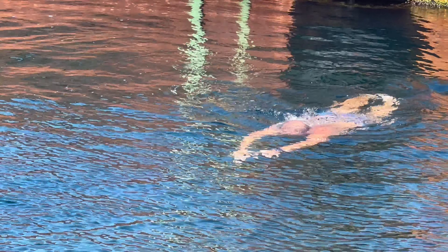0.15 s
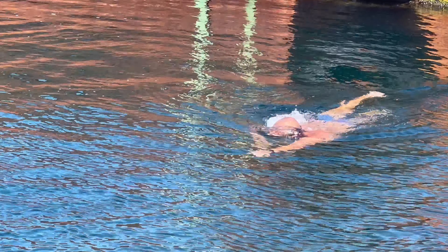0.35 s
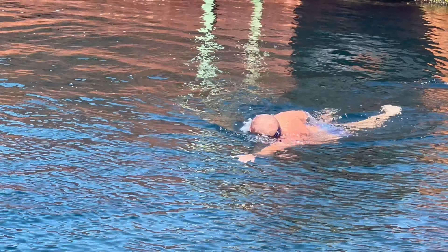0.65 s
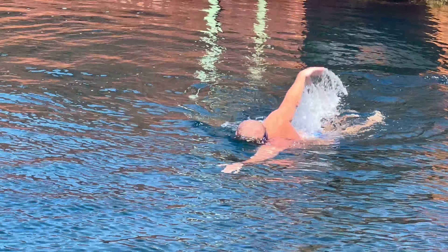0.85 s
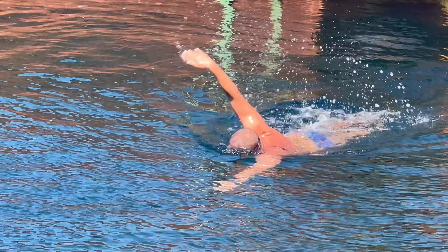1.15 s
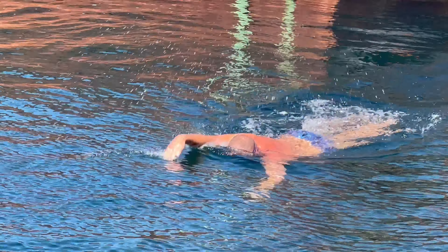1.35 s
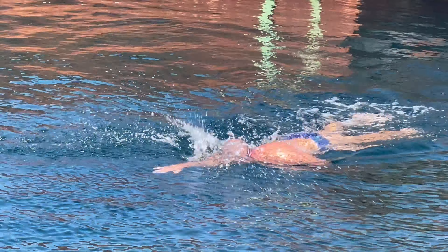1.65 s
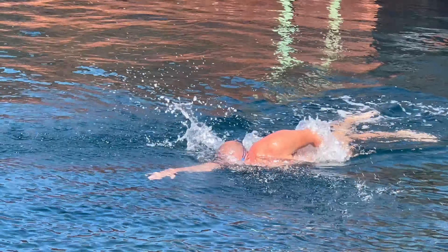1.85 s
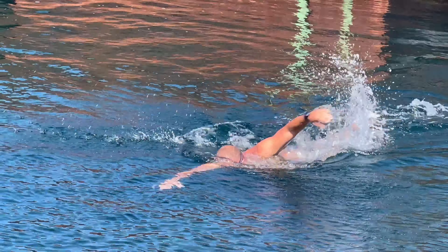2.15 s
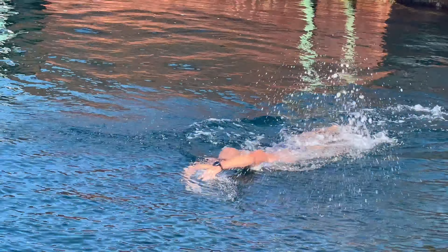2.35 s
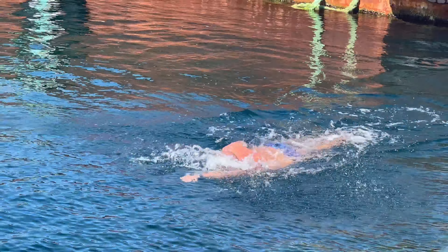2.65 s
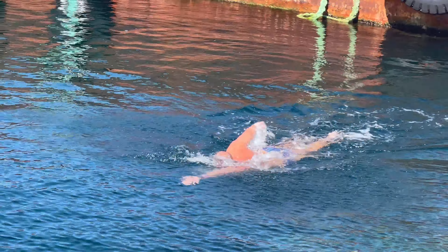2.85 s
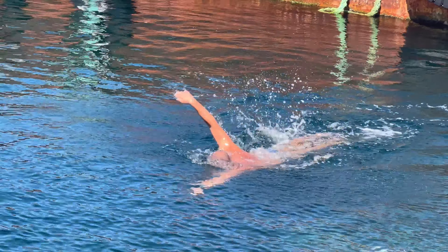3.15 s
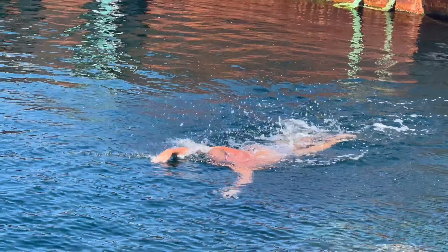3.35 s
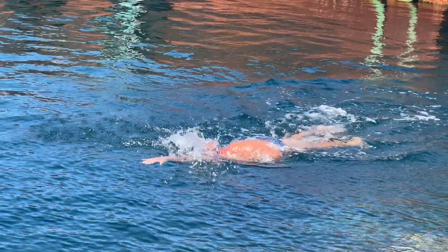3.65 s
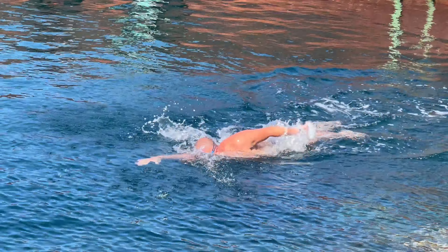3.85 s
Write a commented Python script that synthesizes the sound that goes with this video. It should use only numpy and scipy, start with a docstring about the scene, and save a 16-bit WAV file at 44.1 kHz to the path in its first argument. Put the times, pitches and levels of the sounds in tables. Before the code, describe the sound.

A swimmer does front crawl some way off, at first barely heard over a harbour's steady wash. Gusty wind rumbles and thumps on the microphone throughout, easing briefly between 0.5 and 1.1 seconds. Hands slap the water near 1.4, 2.4 and 3.4 seconds, with gurgles, bubbles and falling spray in between. The churning grows toward the end, with another splash near 3.9 seconds.

```python
"""Gusty wind rumbles, flutters and thumps on the microphone from the start, over a harbour's steady wash.
Some way off a swimmer does front crawl, at first barely heard. Near 1.4 s a hand slaps in, and
slaps return about once a second; between them trapped air gulps, bubble clouds ring and spray rains back.
The quay wall gives the plops a short, dull tail, and the churning grows toward the end."""
import sys
import numpy as np
from scipy import signal
from scipy.fft import rfft, irfft, next_fast_len
from scipy.io import wavfile
from scipy.ndimage import uniform_filter1d, map_coordinates

SR = 44100
rng = np.random.default_rng(int(sys.argv[2]) if len(sys.argv) > 2 else 0)


def generate_wav(sig):
    """Save sig (samples, or channels by samples) to the path in sys.argv[1] as 16-bit PCM at SR."""
    pcm = np.round(np.clip(np.atleast_2d(sig).T, -1, 1) * 32767).astype(np.int16)
    wavfile.write(sys.argv[1], SR, pcm)


N = 176400
TOP_HZ = 15850

# stereo image of the water noises (frequency [Hz], left-right likeness [0-1])
WATER_LIKENESS = [(200, 0.58), (450, 0.76), (750, 0.19), (1200, 0.72), (2100, 1), (4200, 0.89),
                  (7000, 0.83), (8700, 1), (10000, 1), (12000, 0.64), (13500, 1), (15500, 0.69)]


def amp(db):
    """Decibels to gain."""
    return 10 ** (np.asarray(db) / 20)


def unit(x):
    """Scale to rms 1."""
    return x / np.sqrt(np.mean(x ** 2) + 1e-20)


def clock():
    """The time of every sample, in seconds."""
    return np.arange(N) / SR


def along(points, hz):
    """Read (frequency, value) points on a log axis."""
    freqs, values = np.transpose(points)
    return np.interp(np.log(hz + 1), np.log(freqs + 1), values)


def curve(points):
    """Read (time, value) points at every sample."""
    return np.interp(clock(), *np.transpose(points))


def wobble(rate):
    """A smooth random curve with `rate` knots a second."""
    return map_coordinates(rng.standard_normal(4096), [clock() * rate], mode="wrap")


def filtered(x, response):
    """Filter x by a gain given as a function of frequency."""
    size = next_fast_len(N + SR // 4)
    return irfft(rfft(x, size) * response(np.fft.rfftfreq(size, 1 / SR)), size)[..., :N]


def stereo_noise(spectrum, likeness, patchy_db):
    """Coloured stereo noise, mottled in time and pitch by patches of random gain; rms 1."""
    cells = signal.stft(rng.standard_normal((2, N)), nperseg=256)[2]
    patches = uniform_filter1d(rng.standard_normal(cells.shape[1:]), size=4, axis=0)
    patches = unit(uniform_filter1d(patches, size=5, axis=1))
    pair = unit(signal.istft(cells * amp(patchy_db * patches), nperseg=256)[1][:, :N])

    def mid_side_gains(hz):
        width = np.arccos(np.clip(along(likeness, hz), -.99, .99)) / 2
        return amp(along(spectrum, hz)) * np.array([np.cos(width), np.sin(width)])

    mid, side = filtered(pair, mid_side_gains)
    return unit(np.array([mid + side, mid - side]))


def bubbles(starts, hz, gains, cycles, glide):
    """Bubbles ring as sines that glide upward while dying by 60 dB in `cycles` periods."""
    samples = np.arange(SR // 30)
    turns = hz[:, None] * samples / SR
    age = turns / cycles
    envelopes = gains[:, None] * np.exp(-np.log(1000) * age) * (1 - np.exp(-2 * turns))
    rings = envelopes * np.sin(2 * np.pi * turns * (1 + glide * age))
    positions = np.round(starts * SR).astype(int)[:, None] + samples
    return np.bincount(positions.ravel(), rings.ravel(), N)[:N]


def drops(count, low_hz, high_hz, cycles, scatter_db):
    """A shower of small bubbles, a few of them much louder; rms 1."""
    when, pitch, size = rng.random((count, 3)).T
    hz = low_hz * (high_hz / low_hz) ** pitch
    gains = amp(-scatter_db * np.log(size + .01))
    return unit(bubbles(when * N / SR, hz, gains, cycles, glide=0.093))


def wash():
    """The bed: open water washing steadily, far off."""
    # tone of the wash (frequency [Hz], relative level [dB])
    spectrum = [(40, 1.5), (200, -8.5), (450, 3), (750, -0.5), (1050, 0), (1500, -10), (2300, -12.5),
                (4000, -25), (8000, -32.5), (15000, -32)]
    return amp(-48.5 + 0.24 * wobble(7.3)) * stereo_noise(spectrum, WATER_LIKENESS, patchy_db=2.0)


def gusts():
    """Wind on the microphone drives a deep rumble and a choppy flutter."""
    # wind strength (time [s], relative level [dB])
    strength = [(0.04, -31), (0.15, -36), (0.22, -32), (0.24, -36), (0.34, -33), (0.5, -48), (0.69, -39),
                (0.91, -51.5), (1.23, -28.5), (1.35, -37), (1.47, -35), (1.51, -34.5), (1.57, -32.5),
                (1.62, -40.5), (1.74, -31.5), (2.08, -36.5), (2.19, -39.5), (2.25, -30.5), (2.38, -35.5),
                (2.4, -37.5), (2.59, -36), (2.63, -41.5), (2.86, -33.5), (2.9, -43), (2.96, -30),
                (3.06, -34), (3.08, -30), (3.23, -45), (3.27, -30.5), (3.37, -34.5), (3.66, -33.5),
                (3.69, -28.5), (3.71, -30), (3.84, -30), (3.89, -30.5), (4.0, -31)]
    # the flutter's ride on top of that strength (time [s], relative level [dB])
    flutter_ride = [(.04, -3.5), (.2, -8), (.33, -5.5), (.9, -9), (1.2, -7.5), (1.35, 2.5), (1.6, -13.5),
                    (1.8, -2), (2.1, -6), (2.3, -5), (2.6, 2.5), (2.9, -2), (3.1, -4.5), (3.4, -7.5),
                    (3.65, -4.5), (3.92, -2)]
    # tone of the rumble (frequency [Hz], relative level [dB])
    rumble_spectrum = [(20, -22), (35, -8), (50, -5.5), (68, 0.5), (110, -2), (170, -8), (300, -22),
                       (550, -36), (1200, -71), (5000, -100)]
    # tone of the flutter (frequency [Hz], relative level [dB])
    flutter_spectrum = [(50, -21), (130, -0.5), (250, 4), (420, -5), (600, -13.5), (900, -28), (2000, -53),
                        (6000, -89)]
    # stereo image of the wind (frequency [Hz], left-right likeness [0-1])
    likeness = [(60, 0.9), (250, 0.87), (500, 0.77), (900, 0.17)]
    strength_db = curve(strength)
    rumble_gain = amp(strength_db + 2.8 + 0.73 * wobble(30))
    rumble = stereo_noise(rumble_spectrum, likeness, patchy_db=1.24)
    flutter_gain = amp(strength_db + curve(flutter_ride) - 1)
    flutter = unit(amp(2.7 * wobble(70)) * stereo_noise(flutter_spectrum, likeness, patchy_db=1.0))
    return rumble_gain * rumble + flutter_gain * flutter


def eddy(hz, rise_cycles=1.21, wander_depth=0.27):
    """One swirl of air pressure swells and dies in a few uneven cycles."""
    turns = hz * np.arange(SR // 16) / SR
    age = turns / rise_cycles
    wander = map_coordinates(rng.standard_normal(128), [2 * turns], mode="wrap")
    phase = rng.random() + np.cumsum(hz * np.exp(wander_depth * wander)) / SR
    return age * np.exp((1 - age ** 2) / 2) * np.sin(2 * np.pi * phase)


def wind_thumps(wake_db=-8.5, wake_delay_s=0.00687, wake_ratio=0.672, lowpass_hz=750):
    """Single eddies thump the microphone, each trailing a softer, lower wake."""
    # eddy hits (time [s], relative level [dB], pitch [Hz])
    hits = [(0.047, -21, 317), (.056, -26.5, 260), (.082, -25.5, 394), (0.159, -27, 210), (0.2, -18, 128),
            (0.256, -25, 307), (0.277, -20, 248), (.289, -17, 302), (0.297, -17.5, 440),
            (0.332, -21.5, 360), (.349, -26, 300), (.382, -21.5, 370), (.404, -31.5, 370),
            (0.574, -23.5, 205), (0.651, -29.5, 397), (.685, -26, 240), (1.058, -25.5, 190),
            (1.15, -18, 345), (1.178, -27, 565), (1.198, -26, 474), (1.204, -14.5, 160),
            (1.226, -15.5, 266), (1.244, -15.5, 412), (1.292, -28, 160), (1.326, -22, 432),
            (1.359, -29, 346), (1.379, -39, 384), (1.411, -18, 301), (1.423, -22, 532), (1.459, -18, 324),
            (1.564, -25, 230), (1.695, -22.5, 228), (1.776, -19, 380), (1.791, -22, 214),
            (1.823, -17.5, 363), (1.863, -23, 390), (1.906, -22.5, 258), (2.056, -18.5, 137),
            (2.18, -18.5, 246), (2.354, -24.5, 357), (2.547, -22.5, 338), (2.652, -20.5, 297),
            (2.765, -26, 246), (2.836, -19, 309), (2.945, -15, 310), (2.957, -16, 214), (3.058, -18.5, 298),
            (3.091, -25, 242), (3.11, -26.5, 336), (3.247, -20, 287), (3.304, -22.5, 318),
            (3.395, -27, 335), (3.505, -21.5, 267), (3.69, -23, 85), (3.765, -28, 336), (3.806, -28.5, 263),
            (3.904, -14.5, 380), (3.914, -14.5, 380), (3.969, -21, 307)]
    thumps = np.zeros((2, N + SR))
    for time, db, hz in hits:
        swirl = eddy(hz) + amp(-13) * eddy(hz) * np.array([[1], [-1]])  # mid plus a little side
        wake = amp(wake_db) * eddy(hz * wake_ratio)
        for start, wave in ((time, swirl), (time + wake_delay_s, wake)):
            first = round(start * SR)
            thumps[:, first:first + len(wake)] += amp(db - 4) * wave
    return filtered(thumps[:, :N], lambda hz: 1 / np.sqrt(1 + (hz / lowpass_hz) ** 8))


def churn():
    """Foam, falling spray and small bubbles swell and ebb together around the swimmer."""
    # strength of the churning (time [s], relative level [dB])
    swell = [(.04, -62), (.4, -97), (.72, -65), (.83, -59), (.9, -64.5), (1.1, -59), (1.33, -64.5),
             (1.55, -64), (1.63, -56.5), (1.69, -61), (2.01, -52), (2.1, -56), (2.4, -55.5), (2.65, -53.5),
             (2.85, -60.5), (2.91, -56), (3.02, -59.5), (3.3, -58.5), (3.55, -57.5), (3.76, -53), (4, -53)]
    # tone of the foam (frequency [Hz], relative level [dB])
    foam_spectrum = [(200, -5), (600, -19), (1150, 11), (1650, 0), (2050, 2.5), (3200, -3), (5000, -8.5),
                     (8200, -12), (12000, -12.5), (15500, -18)]
    foam = stereo_noise(foam_spectrum, WATER_LIKENESS, patchy_db=2.0)
    spray = drops(count=1300, low_hz=2600, high_hz=9000, cycles=50, scatter_db=2.4)
    burble = drops(count=800, low_hz=800, high_hz=2900, cycles=42, scatter_db=2)
    gain = amp(curve(swell) + 0.8 * wobble(25))
    return gain * (amp(4.5) * foam + amp(-5) * spray + amp(-.3) * burble)


def flutter_and_bubble_clouds(count=45, top_pitch_ratio=1.632):
    """Clusters of short rings: a brief mid-pitched wind flutter, then the swimmer's bubble clouds."""
    # the first row, near 0.28 s, is wind on the microphone; the later rows are bubble clouds
    # (centre time [s], nominal half length [s], level [dB], centre pitch [Hz])
    clusters = [(0.275, .03, -52, 745), (0.835, 0.028, -56.5, 1690), (1.868, 0.078, -52, 1186),
                (1.998, 0.028, -48.5, 1650), (2.255, 0.078, -49.5, 818), (2.625, 0.03, -60, 2150),
                (2.951, 0.11, -52.5, 1460), (3.412, 0.018, -47.5, 3300), (3.77, 0.053, -47.5, 800),
                (3.929, 0.062, -39.5, 448), (3.885, 0.13, -56.5, 1940)]
    out = np.zeros(N)
    for centre, half_length, db, hz in clusters:
        when, pitch, size = rng.uniform(-1, 1, (3, count))
        starts = np.clip(centre + 1.5 * half_length * when, 0, N / SR)
        gains = amp(2.5 * size) * np.exp(-when ** 2)
        cluster = bubbles(starts, hz * top_pitch_ratio ** pitch, gains, cycles=34, glide=0.066)
        out += amp(db) * unit(cluster) * np.sqrt(2 * half_length * SR / N)
    return out


def gulps(count=4, gap_s=0.001748, pitch_spread=.17, step_db=4):
    """A trapped air pocket breaks into a few rising chirps, each softer than the last."""
    # closing air pockets (time [s], relative level [dB], pitch [Hz])
    pockets = [(1.4, -30, 2130), (1.464, -30.5, 1290), (1.737, -33, 1370), (1.82, -35, 1150),
               (1.909, -36, 1130), (1.938, -26.5, 1306), (1.968, -31, 1130), (1.996, -25, 1465),
               (2.135, -23.5, 694), (2.147, -29, 800), (2.179, -25, 944), (2.217, -32, 1070),
               (2.237, -31, 754), (2.258, -35, 751), (2.287, -37, 790), (2.321, -35, 1105),
               (2.42, -29, 980), (2.446, -31.5, 2060), (2.712, -30, 1190), (2.725, -27, 1185),
               (3.411, -32, 2800), (3.415, -33, 1080), (3.587, -29, 1164), (3.592, -30.5, 698),
               (3.72, -29.5, 1990), (3.725, -26, 626), (3.752, -29, 710), (3.769, -27, 2080),
               (3.772, -34, 885), (3.902, -26.5, 1090)]
    out = np.zeros(N)
    order = np.arange(count)
    follows = order > 0  # only the first bubble is exactly on time and on pitch
    for time, db, hz in pockets:
        pitches = hz * np.exp(pitch_spread * rng.standard_normal(count) * follows)
        starts = time + gap_s * (order + rng.random(count) * follows)
        out += bubbles(starts, pitches, amp(db - 5.54 - step_db * order), cycles=34, glide=.16)
    return out


def cracks(count=3, scatter_s=0.00044, pitch_spread=0.25):
    """Single drops and flat smacks crack on the surface, each ringing a few very short bubbles."""
    # surface impacts (time [s], relative level [dB], pitch [Hz])
    impacts = [(1.375, -42, 5220), (1.3995, -26.5, 3400), (1.4012, -21, 2090), (1.4365, -33, 7400),
               (1.443, -32, 5300), (1.473, -36, 5000), (1.626, -34, 5470), (1.911, -33, 6400),
               (2.109, -36, 4360), (2.419, -31, 6060), (2.638, -34, 4000), (2.789, -30, 6650),
               (3.329, -32, 4930), (3.358, -32.5, 3450), (3.396, -35, 4570), (3.415, -29, 4570),
               (3.425, -33, 6500), (3.918, -29.5, 3870)]
    times, db, hz = np.repeat(impacts, count, axis=0).T
    detune, delay = rng.standard_normal((len(times), 2)).T
    starts = times + scatter_s * np.abs(delay)
    return bubbles(starts, hz * np.exp(pitch_spread * detune), amp(db - 2.5), cycles=15, glide=0.1)


def slaps():
    """A hand or foot breaks the surface in a short burst of hiss and ringing droplets."""
    # hand and foot hits (time [s], relative level [dB], attack [s], decay by 60 dB [s])
    hits = [(1.389, -45.5, 0.0093, 0.28), (1.397, -43, .001, 0.0096), (1.432, -49, 0.0038, 0.044),
            (2.417, -48, 0.0019, 0.19), (2.635, -50.5, .002, 0.045), (2.772, -50, .006, 0.11),
            (3.354, -44, 0.0024, 0.093), (3.381, -41.5, 0.027, 0.18), (3.412, -48, .002, 0.043),
            (3.424, -42, .001, 0.032), (3.903, -43.5, 0.0059, 0.087)]
    # tone of the splash (frequency [Hz], relative level [dB])
    hiss_spectrum = [(300, -23), (1200, -4), (2800, -4), (5000, -5), (8000, -6.5), (12000, -8),
                     (15500, -16)]
    envelope = np.zeros(N)
    for time, db, attack, t60 in hits:
        age = np.maximum(clock() - time, 0)
        envelope += amp(db) * (1 - np.exp(-age / attack)) * np.exp(-np.log(1000) * age / t60)
    droplets = drops(count=1900, low_hz=2600, high_hz=9000, cycles=36, scatter_db=3.5)
    hiss = amp(2.2 * wobble(260)) * stereo_noise(hiss_spectrum, WATER_LIKENESS, patchy_db=-0.5)
    return envelope * (amp(4.5) * hiss + amp(-7) * droplets)


def quay_echo(plops, send_db=-9.5, attack_s=0.0096, t60_s=0.2, lowpass_hz=3940):
    """The quay wall and the rippled surface scatter a short, dull tail after each plop."""
    t = np.arange(SR // 3) / SR
    tail = rng.standard_normal(len(t)) * (1 - np.exp(-t / attack_s)) * np.exp(-np.log(1000) * t / t60_s)
    echo = signal.fftconvolve(plops, tail / np.linalg.norm(tail))[:N]
    return plops + amp(send_db) * filtered(echo, lambda hz: 1 / (1 + 1j * hz / lowpass_hz))


def microphone_ports(hz):
    """The two microphone ports hear the water with different level and phase."""
    # the water's lean to the left (frequency [Hz], left minus right [dB])
    lean = [(300, 9), (700, 1.5), (1150, 4.5), (2000, 0), (8000, 0)]
    # phase between the ports (frequency [Hz], lead of the left [rad])
    phase = [(300, 0), (850, .7), (1450, -.25), (2200, 0), (3400, .6), (4600, .5), (5400, 0), (7300, 0),
             (8500, -1), (9200, -2.5), (9700, -3.1), (10300, -3.2), (10900, -3.7), (12000, -5),
             (13000, -6.2), (14000, -6.4), (15800, -8.6)]
    side = np.array([[.5], [-.5]])
    return amp(side * along(lean, hz)) * np.exp(1j * side * along(phase, hz))


def scene(start_s=0.034):
    """Water ahead and slightly left, wind on the microphone; both cut in after a near-silent instant."""
    water = wash() + churn() + slaps()
    plops = cracks() + gulps() + flutter_and_bubble_clouds()
    water = filtered(water + quay_echo(plops), microphone_ports)
    wind = gusts() + wind_thumps()
    fade_in = np.clip((clock() - start_s) * 400, .001, 1)
    return (water + wind) * fade_in


def record(dry):
    """Roll off the deepest rumble, below 27 Hz, and cut everything above the band limit."""
    return filtered(dry, lambda hz: (hz < TOP_HZ) * hz ** 3 / np.sqrt(hz ** 6 + 27. ** 6))


dry = scene()
out = record(dry)
generate_wav(out)
```